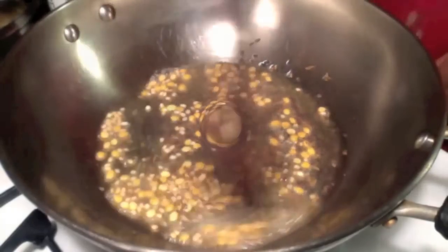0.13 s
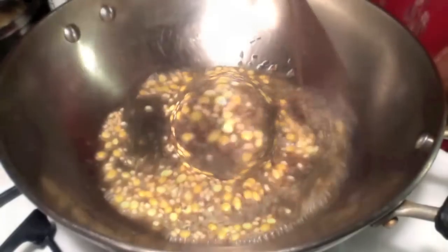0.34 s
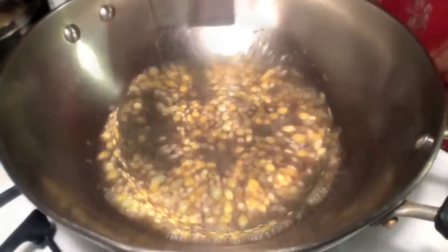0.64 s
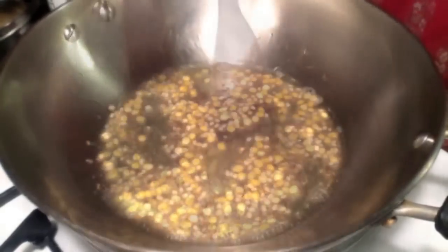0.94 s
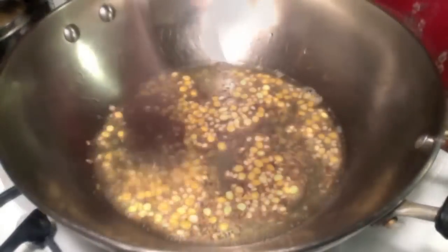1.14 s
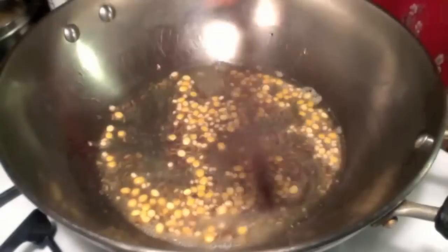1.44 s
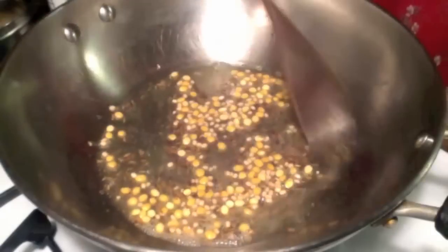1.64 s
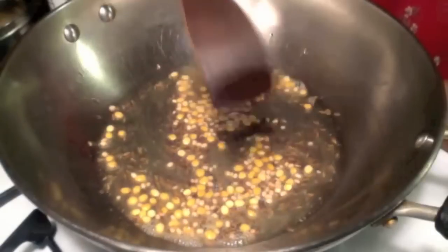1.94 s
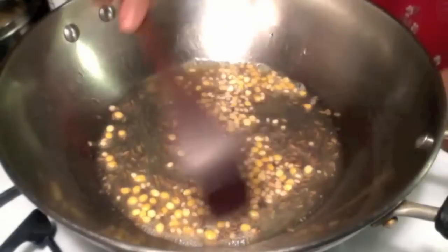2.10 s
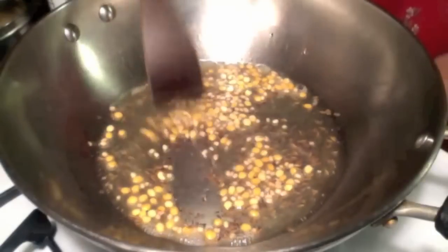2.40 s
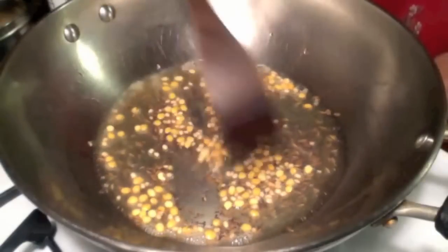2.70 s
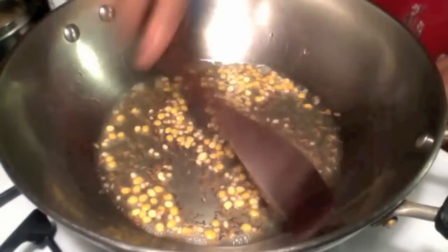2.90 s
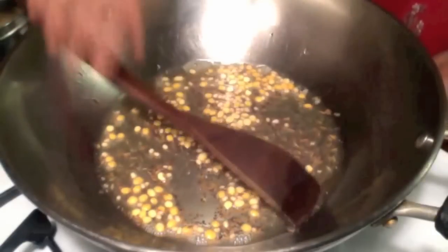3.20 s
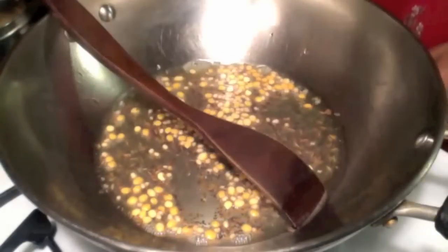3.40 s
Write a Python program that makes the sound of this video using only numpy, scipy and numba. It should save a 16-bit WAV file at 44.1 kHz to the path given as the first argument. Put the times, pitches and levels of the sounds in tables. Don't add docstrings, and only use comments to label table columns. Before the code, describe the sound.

Wooden spatula pushing seeds around a steel pan, ticking lightly, then knocking and clattering on the rim.

```python
import sys
import numpy as np
from scipy import signal
from scipy.fft import rfft, irfft
from scipy.io import wavfile
from scipy.ndimage import uniform_filter1d
from numba import njit

SR = 44100
rng = np.random.default_rng(int(sys.argv[2]) if len(sys.argv) > 2 else 0)


def boost(x):
    u = np.asarray(x, float) / 20
    return 10 ** u


def store_pcm(level_fs):
    pcm = np.round(np.clip(level_fs, -1, 1) * 32767).astype(np.int16)
    wavfile.write(sys.argv[1], SR, np.atleast_2d(pcm).T)


N = 156555


def level(x, db):
    return x * boost(db) / np.sqrt(np.mean(x ** 2))


def band(x, hz, width):
    return signal.lfilter(*signal.iirpeak(min(hz, .45 * SR), hz / width, SR), x)


def noise_band(n, hz, width, second_width):
    return band(band(rng.standard_normal(n), hz, width), hz, second_width)


def walk(rate):
    hold = int(SR / rate)
    steps = np.repeat(rng.standard_normal(N // hold + 1), hold)
    return 1.03 * uniform_filter1d(uniform_filter1d(steps, hold), hold)[:N]


def add(out, start_s, x):
    i = int(start_s * SR)
    out[i:i + len(x)] += x[:N - i]


def ring(modes, t, scatter_db):
    hz, db, t60 = np.array(modes).T[:, :, None]
    chance = rng.standard_normal((3, len(modes), 1))
    strength = boost(db + scatter_db * chance[0])
    cycles = hz * (1 + 0.0022 * chance[1]) * t + chance[2]
    return (strength * np.sin(2 * np.pi * cycles) * 1000. ** (-t / t60)).sum(0)


# f/Hz, level/dB per Hz
AIR = [(290, -40), (500, -5), (1320, -7), (4600, -19), (5310, -13), (15000, -40)]
# f/Hz, width/Hz, level/dB
HUM = [(120, 7.2, -65), (136.5, 16, -64.5), (152, 22, -68), (202, 60, -71.5), (268.5, 11, -68),
       (310, 84, -70), (85, 54, -75.5), (410, 6, -70.5), (700, 85, -69.5), (874, 95, -69.5)]
# f/Hz, width/Hz, level/dB
BURNER = [(5180, 400, -65.5), (6450, 520, -68.5), (2500, 500, -69)]


def kitchen():
    hz, db = np.array(AIR).T
    f = np.maximum(np.fft.rfftfreq(N, 1 / SR), 1)
    shape = boost(np.interp(np.log(f), np.log(hz), db))
    middle = shape[(f > 400) & (f < 4000)]
    middle_share = np.sqrt(np.sum(middle ** 2) / np.sum(shape ** 2))
    air = level(irfft(rfft(rng.standard_normal(N)) * shape, N), -58.5) / middle_share
    out = air * boost(1.3 * walk(2.92))
    for hz, width, db in HUM:
        out += level(noise_band(N, hz, width, 2 * width), db)
    for hz, width, db in BURNER:
        out += level(noise_band(N, hz, width, 2 * width), db) * boost(2.2 * walk(6.2))
    return out


# f/Hz, t60/s, level/dB against the direct sound
ROOM = [(196, 0.39, -9.5), (500, 0.31, -8), (1200, .3, -8), (2800, 0.31, -8), (5500, 0.25, -8),
        (10000, 0.18, -7)]


def room(x):
    first_echo_s = 0.0034
    t = np.arange(SR // 2) / SR
    tail = np.zeros(len(t))
    for hz, t60, db in ROOM:
        fading = band(rng.standard_normal(len(t)), hz, hz * 1.12) * 1000. ** (-t / t60)
        tail += level(fading, db + 10 * np.log10(hz / 16000))
    tail = tail * np.clip(t / first_echo_s, 0, 1) / np.sqrt(len(t))
    return x + signal.fftconvolve(x, tail)[:N]


# (f/Hz, level/dB, t60/s)
SETTLE = (2.87, -35, [(291, 1, .55), (221, -3, .5)])


def settle():
    out, t = np.zeros(N), np.arange(SR // 2) / SR
    start_s, db, partials = SETTLE
    add(out, start_s, boost(db) * ring(partials, t, 0) * np.minimum(t / .03, 1))
    return out


# t/s, level/dB, f/Hz, t60/s
SINGS = [(.613, -18, 2150, .03), (.613, -20, 3150, .02), (.613, -22, 5250, .025), (.614, -26, 6400, .02),
         (.618, -25, 960, .1), (.618, -23, 1187, .11), (.692, -33, 1000, .1), (2.861, -18, 2013, .05),
         (2.861, -17, 4950, .045), (2.862, -24, 5814, .06), (2.862, -23, 7100, .05), (2.862, -19, 960, .09),
         (1.18, -40, 1950, .15), (1.486, -28, 1185, .12), (1.50, -38, 221, .25), (2.099, -38, 600, .05),
         (2.482, -33, 600, .06), (2.508, -31, 2520, .05), (2.507, -27, 4000, .02), (2.507, -27, 5900, .02),
         (2.862, -12, 1184, .085), (3.038, -17, 1190, .16), (3.062, -17, 7190, .1), (3.068, -18, 1016, .22),
         (3.050, -9, 2330, .03), (3.061, -12, 2700, .05), (3.071, -12, 4950, .04), (3.09, -27, 221, .4),
         (3.093, -15, 4795, .12), (3.112, -14, 2697, .045), (3.12, -25, 579, .25)]


def sings():
    rise_s = .002
    out, t = np.zeros(N), np.arange(SR // 3) / SR
    for start_s, db, hz, t60 in SINGS:
        pair = [(hz, 0, t60), (hz * 1.012, -9, t60)]
        add(out, start_s, boost(db) * ring(pair, t, 0) * np.minimum(t / rise_s, 1))
    return out


# t/s, peak level/dB, f/Hz
TICKS = [(0.0508, -43, 2430), (0.1516, -37, 3890), (0.2039, -38, 4090), (0.2828, -39, 4160),
         (0.3624, -31, 4040), (0.3715, -34, 4140), (0.387, -43, 4100), (0.4304, -43, 4200),
         (0.6836, -27, 3380), (.689, -31, 3300), (0.6968, -28, 3520), (.6968, -31, 6600),
         (0.7084, -28, 3560), (.7215, -30, 2100), (0.7300, -27, 4360), (.731, -29, 2100),
         (.7455, -24, 4800), (.747, -31, 1900), (.759, -32, 3000), (.770, -31, 1900), (.7781, -29, 3890),
         (.793, -34, 4100), (.801, -32, 1750), (.815, -34, 4300), (0.8407, -32, 3180), (0.8595, -33, 3790),
         (1.0969, -35, 3520), (1.1123, -27, 2600), (1.131, -26, 3170), (1.1484, -27, 3690),
         (1.1484, -31, 6500), (1.1603, -24, 6470), (1.1695, -27, 6800), (1.1786, -19, 5740),
         (1.1786, -23, 3900), (1.1987, -29.5, 4090), (1.213, -31, 4000), (1.5517, -35, 3230),
         (1.568, -36, 4300), (1.6112, -34, 4160), (1.6112, -34, 1800), (1.6437, -32, 3440),
         (1.6437, -34, 1900), (1.6826, -27, 2160), (1.684, -32, 6900), (1.7073, -30, 4380),
         (1.7124, -29, 2360), (2.1322, -31, 2240), (2.1322, -32, 1000), (2.1627, -41, 3020),
         (2.1941, -38, 3880), (2.215, -39, 4000), (2.2237, -31, 5880), (2.246, -38, 3900),
         (2.259, -38, 3950), (2.2654, -35, 3910), (2.2829, -38, 3950), (2.4784, -25, 3890),
         (2.531, -31, 3000), (2.543, -31, 4300)]


def ticks():
    t60_s, rise_s, gain_db = .009, .001, 3.5
    spread_octaves, side_db = .2, -8
    out, t = np.zeros(N), np.arange(SR // 40) / SR
    for start_s, db, hz in TICKS:
        octaves = spread_octaves * np.array([-3, -1, 1, 3]) + .1 * rng.standard_normal(4)
        cluster = [(hz, 0, t60_s)] + [(f, side_db, .7 * t60_s) for f in hz * 2 ** octaves]
        add(out, start_s, boost(db + gain_db) * ring(cluster, t, 1.2) * np.minimum(t / rise_s, 1))
    return out


@njit
def grains(out, at, turn, fade, size):
    for k in range(len(at)):
        z, p, i = size[k] + 0j, fade[k] * np.exp(1j * turn[k]), at[k]
        while i < len(out) and abs(z) > size[k] / 300:
            out[i] += z.imag
            z, i = z * p, i + 1
    return out


# start t/s, length/s, release/s per 20 dB, level/dB, ring of the pan there f/Hz
PUSHES = [(-.2, .3, .5, -55, 4200), (.345, .04, .07, -50, 4800), (.676, .055, .05, -37, 3800),
          (.74, .04, .09, -45, 3600), (.83, .04, .08, -52.5, 4000), (0.92, .14, 0.22, -54, 4800),
          (1.095, .105, .06, -45, 3700), (1.28, .2, .3, -57, 4200), (1.39, 0.03, .06, -60, 5000),
          (1.535, 0.04, 0.12, -50, 4000), (1.595, .13, .05, -43.5, 3900), (2.13, .15, .07, -54, 3900),
          (2.479, .05, 0.0263, -39.5, 4300), (3.04, .08, 0.0552, -26, 3800)]
PAN_PARTIALS_HZ = [1820, 1950, 2305, 2660, 3070, 3480, 3900, 4100, 4620, 4800, 5020, 5800, 6550, 7190]


def seeds():
    seeds_per_s, snap_share = 2600, .7
    t60_s, rise_s = .008, .0004
    t = np.arange(N) / SR
    count = int(seeds_per_s * N / SR)
    at = np.sort(rng.integers(0, N, count))
    pick, big = rng.standard_normal(count), rng.exponential(size=count)

    pushes = np.array(PUSHES)
    latest = np.maximum(np.searchsorted(pushes[:, 0], at / SR) - 1, 0)
    push_db, ring_hz = pushes[latest, 3], pushes[latest, 4]
    octaves = np.clip(.5 + .02 * (push_db + 45), .15, .7)
    hz = np.clip(ring_hz * 2 ** (octaves * np.maximum(pick, -pick - 4)), 1500., 14000.)
    nearest = np.array(PAN_PARTIALS_HZ)[np.abs(hz[:, None] - PAN_PARTIALS_HZ).argmin(axis=1)]
    hz = np.where(hz < 7800, hz + snap_share * (nearest - hz), hz)

    turn = 2 * np.pi * hz / SR
    size = boost(4 * np.minimum(big, 3.5) - np.abs(pick))
    t60 = t60_s * 2 ** (-.15 * pick)
    fade = 1000. ** (-1 / (t60 * SR))
    onset_fade = np.full(count, np.exp(-1 / (rise_s * SR)))
    rattle = grains(np.zeros(N), at, turn, fade, size)
    rattle -= grains(np.zeros(N), at, turn, onset_fade, size)

    effort = np.zeros(N)
    for start_s, length_s, release_s, db, _ in PUSHES:
        swell = np.clip((t - start_s) / (.5 * length_s), 0, 1) ** 2
        fall_db = 20 * np.maximum(t - start_s - length_s, 0) / release_s
        effort += swell * boost(db - fall_db)
    swish = band(rng.standard_normal(N), 6000, 7000) * boost(4. * walk(150))
    return effort * (level(rattle, 0) + level(swish, -11)) * boost(2. * walk(39.87))


# f/Hz, level/dB, t60/s
GRATE = [(144, 4, .1), (184, 1, .09), (221.5, -5, 0.31), (288.7, -10, 0.15), (355, -2, 0.057),
         (440, -2, .05), (540, -1, .06), (684, -3, .05)]


def blows(table, modes):
    scatter_db, rough_db, rough_per_s = 2, 3.5, 140
    crack_s, body_s, blow_rise_s, thud_rise_s = .0035, .016, .0007, .01
    out, t = np.zeros(N), np.arange(SR // 3) / SR
    crack_highpass = signal.butter(2, 500, "high", fs=SR)
    for start_s, db, hardness_hz, thud_db, crack_db in table:
        burst = rng.standard_normal(len(t)) * np.exp(-t / crack_s)
        crack = boost(crack_db) * signal.lfilter(*crack_highpass, burst)
        uneven = np.interp(t * rough_per_s, np.arange(99), rng.standard_normal(99))
        uneven_db = rough_db * uneven * np.minimum(t * rough_per_s, 1)
        ringing = ring(modes, t, scatter_db) / 2 * boost(uneven_db)
        body = boost(-11) * 3 * noise_band(len(t), 1150, 1000, 1000) * np.exp(-t / body_s)
        steel = (ringing + crack + body) * np.minimum(t / blow_rise_s, 1)
        softness = signal.butter(6, min(hardness_hz, .4 * SR), fs=SR, output="sos")
        steel = signal.sosfilt(softness, steel)
        thud = boost(thud_db) * ring(GRATE, t, scatter_db) * np.minimum(t / thud_rise_s, 1) / 2
        add(out, start_s, boost(db) * (steel + thud))
    return out


# t/s, level/dB, hardness f/Hz, thud level/dB, crack level/dB
KNOCKS = [(.258, -39.5, 900, 4, 2), (.6135, -19, 6800, -17, 6), (1.052, -48, 5000, 17, 4),
          (1.25, -60, 500, 18, -8), (1.485, -24, 1400, -8, 11), (2.0966, -45, 11000, 14.5, 15.5),
          (2.132, -48, 2800, 4, 13), (2.4783, -41, 8000, 9, 18), (2.486, -43, 5000, 9, 17),
          (2.5072, -42.5, 10900, 4, 19), (2.8618, -11, 9000, -16, -2), (3.0365, -17, 7500, -20, 8)]
# f/Hz, level/dB, t60/s
BOWL = [(576, -15, 0.17), (760, -11, .05), (945.5, -4, 0.088), (1016, -14.5, 0.14), (1058, -8, .08),
        (1188.3, -3, .09), (1358, -15, .1), (1647, -13, 0.057), (1775, -16.5, 0.085), (1995, -8, .03),
        (2300, -9, .025), (4900, -9, .04), (5150, -20, .12), (7200, -17, .06)]


def knocks():
    return blows(KNOCKS, BOWL)


# t/s, level/dB, hardness f/Hz, thud level/dB, crack level/dB
CLATTER = [(3.0500, -15, 5200, -21, 15), (3.0600, -15, 7000, -17, 13), (3.0625, -13, 10000, -16, 13),
           (3.067, -17, 7000, -18.5, 10), (3.075, -18, 6000, -17, 5.5), (3.087, -18.5, 6000, -16, 11),
           (3.094, -20.5, 5000, -17.5, 10), (3.114, -17.5, 7000, -15, 8.5), (3.119, -21.5, 5000, -10, 9.5),
           (3.135, -27, 5000, -15, 6)]
# f/Hz, level/dB, t60/s
RIM = [(580.6, -11, .2), (1020.8, -7, .13), (1190, -10, 0.14), (1400, -10, 0.13), (1822, -7, 0.091),
       (2297, -1.5, 0.11), (2691, -3, 0.06), (3488, -11, 0.087), (4098, -7, 0.087), (4640, -11, 0.14),
       (4790, -2, .09), (5020, -6, .11), (7150, -6, .07), (9600, -12, .1)]


def clatter():
    return blows(CLATTER, RIM)


def scene():
    pan = settle() + sings() + ticks() + seeds() + knocks() + clatter()
    dulled = signal.lfilter(*signal.butter(2, 6500, fs=SR), pan)
    return (kitchen() + room(dulled))[None]


def top_cut(x):
    return signal.sosfilt(signal.butter(12, 15740, fs=SR, output="sos"), x)


def record(dry):
    x = signal.sosfilt(signal.butter(4, 95, "high", fs=SR, output="sos"), dry)
    ceiling = .97
    rounded = x / (1 + (x / ceiling) ** 6) ** (1 / 6)
    return top_cut(rounded)


dry = scene()
out = record(dry)
store_pcm(out)
```